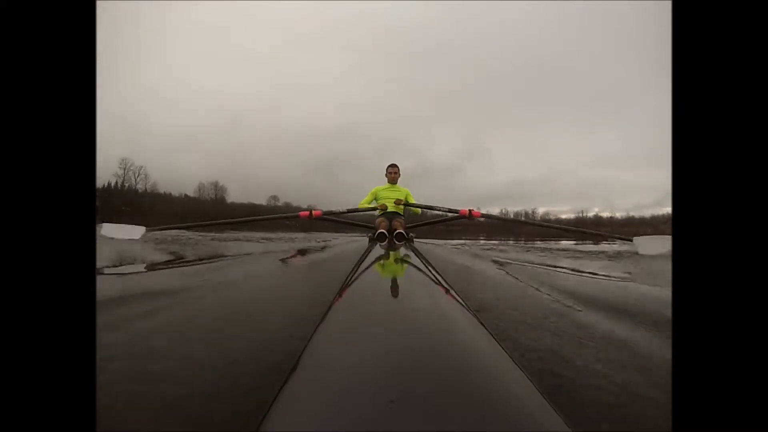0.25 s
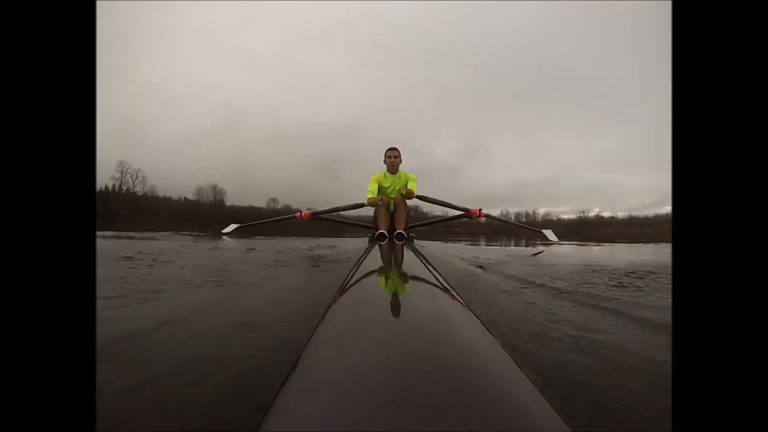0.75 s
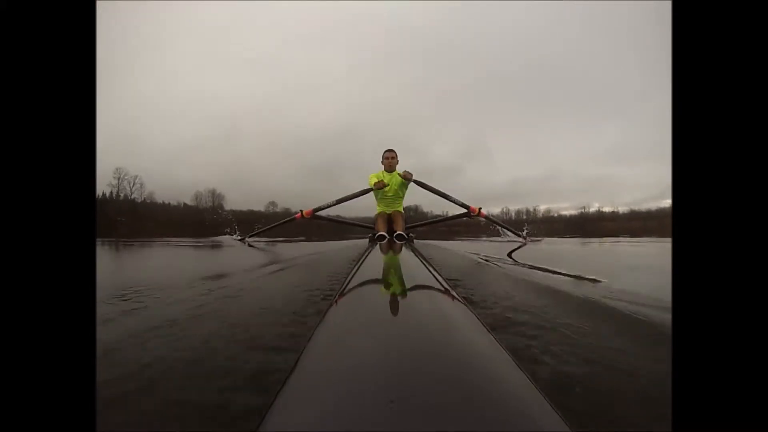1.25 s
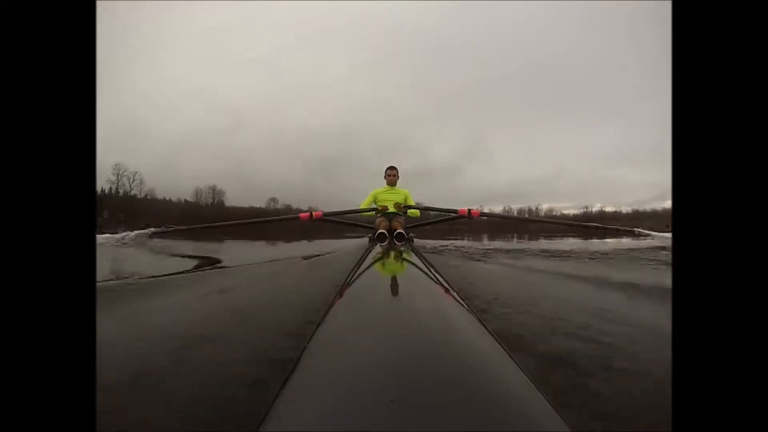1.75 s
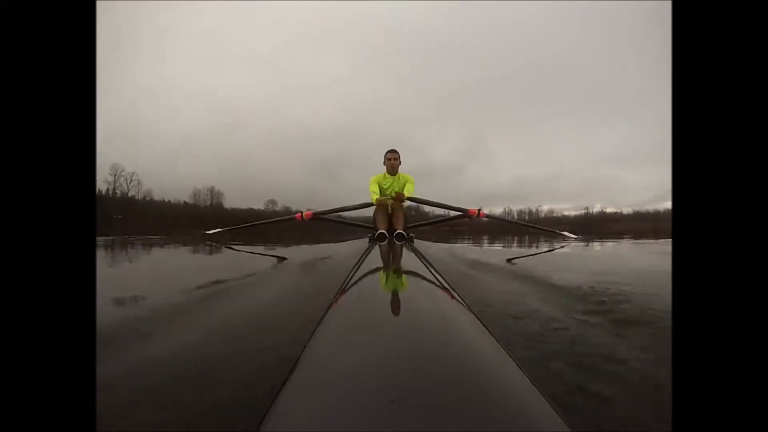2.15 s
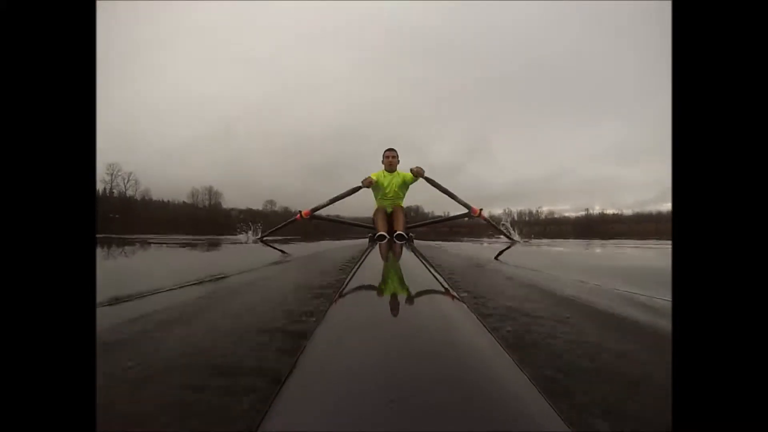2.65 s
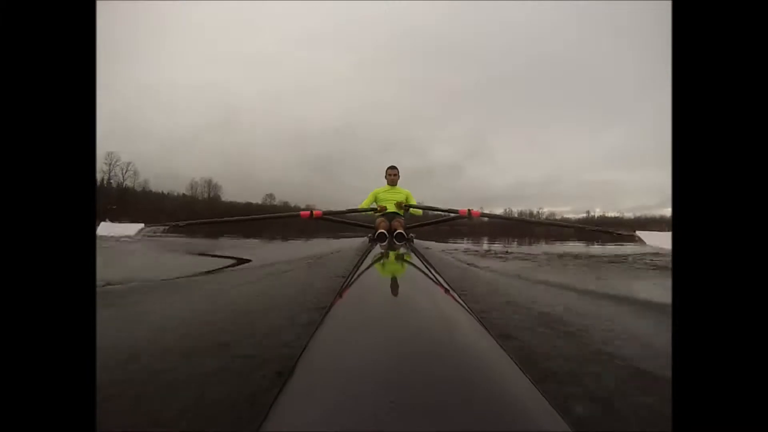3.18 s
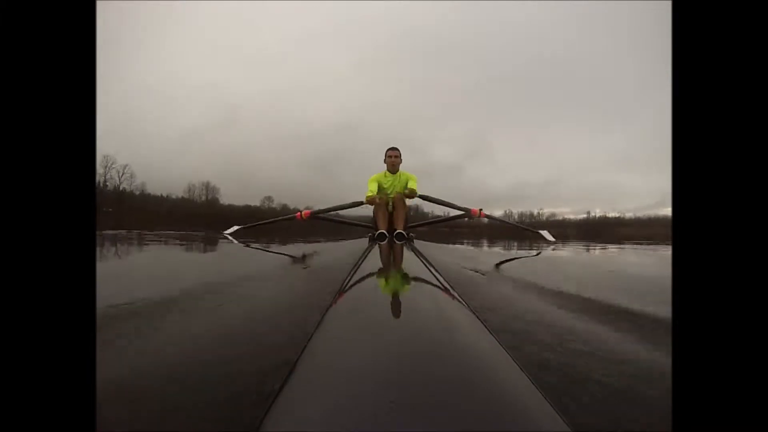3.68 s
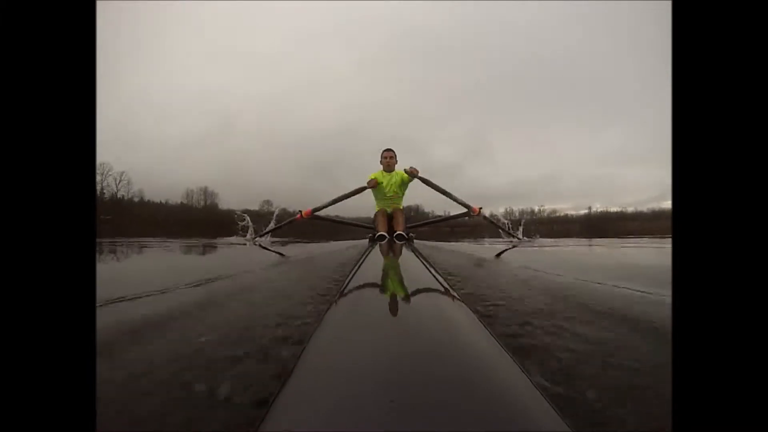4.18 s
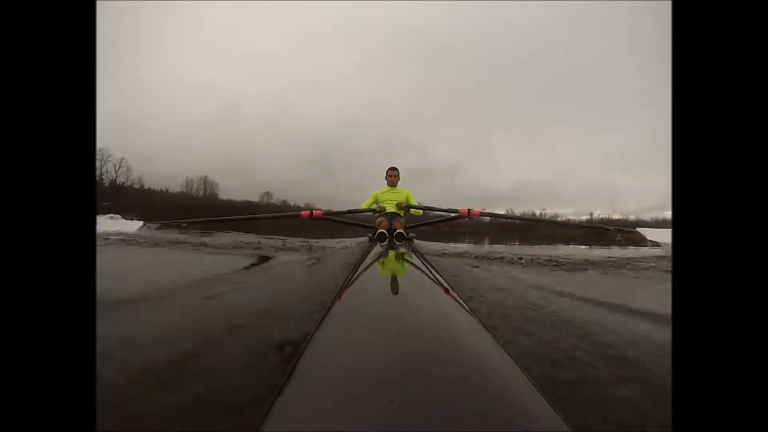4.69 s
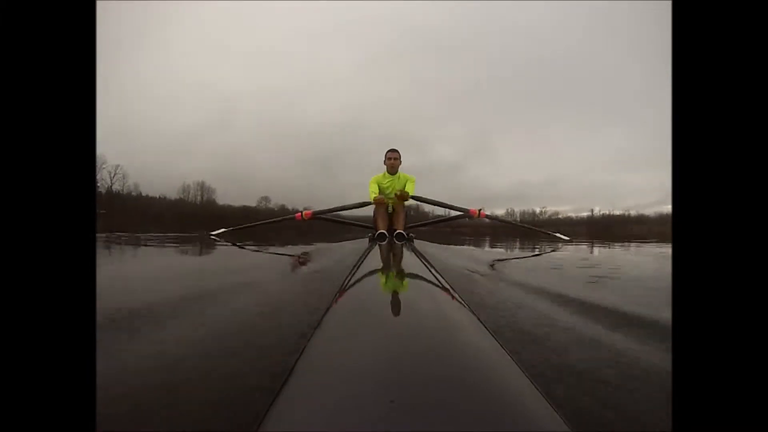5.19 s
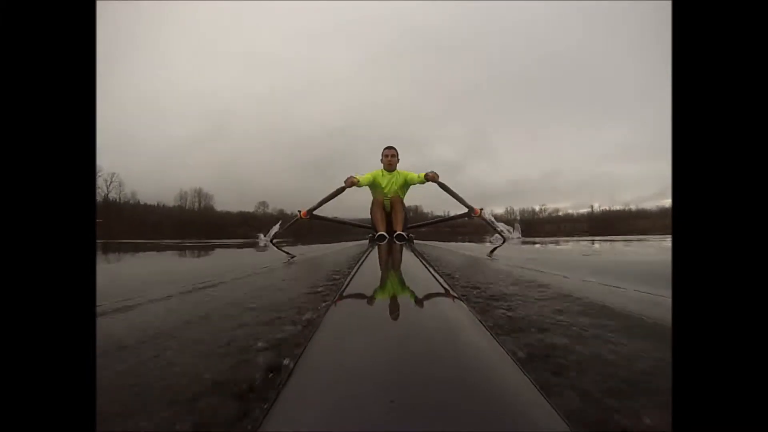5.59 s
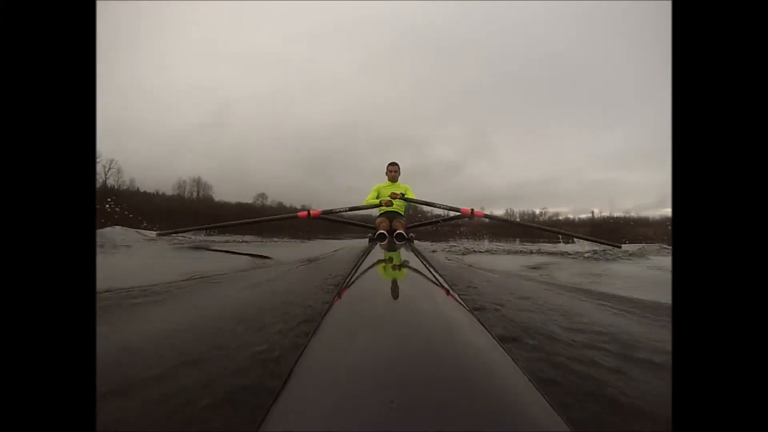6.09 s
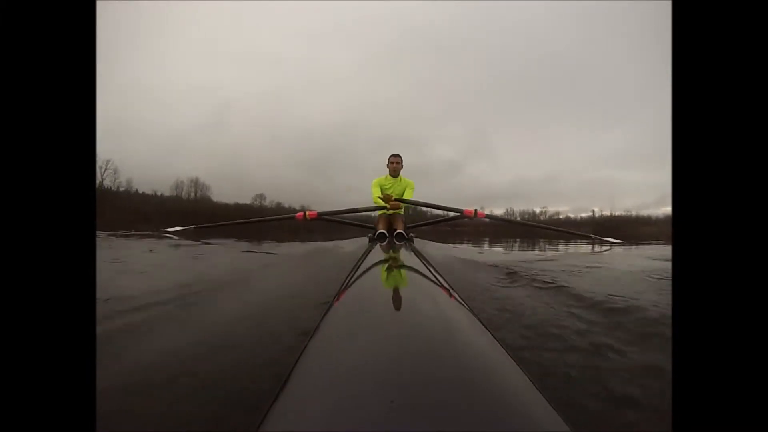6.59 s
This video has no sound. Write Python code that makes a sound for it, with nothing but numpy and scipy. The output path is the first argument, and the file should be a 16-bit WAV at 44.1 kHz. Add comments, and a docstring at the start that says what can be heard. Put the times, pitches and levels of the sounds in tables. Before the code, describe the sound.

Close, dry, outdoor sound picked up through a thin hollow hull on open water. Five strong bursts of clunking oarlocks, with scraping sleeves and tiny bright rattles, alternate with weaker double knocks. Between them come a quiet seat rumble, bubbling blades, swelling water rush and occasional drips, while the camera mount thuds and rumbles deeply underneath.

```python
"""A single scull rowed at racing pace, heard from a camera mounted on its deck as water rushes along the hull.
Five strokes pass. At each finish the oars twist and knock in their oarlocks, and the hollow hull booms.
Then the seat rolls forward; at the catch the oars knock again, the blades gurgle and the hull hums in the drive.
Knocks are decaying modes, the rest is shaped noise, grains and bubbles under swells timed to the strokes.
Throughout, the mount rumbles, hard knocks make the camera housing buzz, and drips and bubbles dot the water."""
import sys
import numpy as np
from scipy import signal
from scipy.fft import rfft, irfft, next_fast_len
from scipy.io import wavfile
from scipy.ndimage import uniform_filter1d, map_coordinates

SR = 44100
rng = np.random.default_rng(int(sys.argv[2]) if len(sys.argv) > 2 else 0)


def unload_wav(signal):
    """Save mono or channel-first audio to the path in sys.argv[1] as 16-bit WAV at rate SR, clipped to [-1, 1]."""
    wavfile.write(
        sys.argv[1],
        SR,
        np.round(np.clip(np.atleast_2d(signal).T, -1, 1) * 32767).astype(np.int16),
    )


N = 301644

# Oars knocking in their oarlocks. Each row: start in seconds, rigger level in dB, sleeve scrape level in dB,
# hull level in dB, hull pitch in Hz, hollow overtone in dB relative to the hull.
KNOCK_EVENTS = [(.303, -17.5, -18.5, -10.5, 223, -16), (0.323, -10.5, -18.5, -4.5, 217.6, -13.5),
                (.347, -36, -21.5, -4, 243, -20.5), (.402, -16.5, -18.5, -4, 255.6, -26),
                (.423, -11, -32, -0.5, 249, -17.5), (0.457, -22, -21.5, -6, 236, -35),
                (.578, -29, -35, -19.5, 218, -29), (.851, -24.5, -27, -8.5, 227, -26),
                (.925, -23, -24, -14, 236, -7), (.953, -13.5, -24, -15.5, 233, -19),
                (.986, -12.5, -32, -9.5, 222, -17), (1.08, -19, -44, -20, 238, -17),
                (1.144, -18, -22, -20, 234, -21), (1.279, -36, -47, -16.5, 250, -26),
                (1.732, -17, -18.5, -12.5, 220, -24.5), (1.737, -17.5, -27, -2, 227, -35),
                (1.765, -13, -23, -3.5, 183.5, -25), (1.776, -15, -12, -2, 262, -18.5),
                (1.803, -30, -47, 0, 224.6, -32), (1.823, -12, -21, -5, 246, -16),
                (1.847, -14, -31, 1, 229.3, -17.5), (1.89, -17, -27.5, -14.5, 211.5, -19),
                (2.41, -16.5, -20, -17.5, 241, -18), (2.434, -14, -18, -6.5, 226, -18),
                (2.486, -27, -35.5, -11, 239, -28), (2.54, -18.5, -39, -13, 243, -25),
                (2.565, -17, -33, -12, 235, -26), (2.634, -20, -24, -13.5, 230, -28),
                (3.208, -10, -16.5, -4, 194.5, -21), (3.23, -11, -22, -1.5, 235.7, -13),
                (3.267, -32, -42, -4.5, 233, -35), (3.283, -9, -44, -12, 219, -27),
                (3.309, -18, -23.5, -3.5, 252, -25), (3.911, -23.5, -34, -10, 240, -6),
                (3.925, -22, -24, -10.5, 246, -7.5), (4.058, -13, -26.5, -17, 250, -23),
                (4.094, -24, -27, -8.5, 235, -21), (4.118, -18.5, -32, -20.5, 238, -22),
                (4.686, -17.5, -31.5, -7, 204.5, -11.5), (4.705, -13.5, -27, -6, 206, -18),
                (4.728, -33, -35, -2.5, 233, -16), (4.776, -7.5, -15.5, -2, 215, -19.5),
                (4.804, -33, -32, -0.5, 223, -30), (4.839, -29, -41, -11.5, 213, -23),
                (4.901, -22, -25, -10, 220, -35), (5.471, -11, -36, -5, 249.5, -14),
                (5.487, -23, -35, -3.5, 251, -16), (5.656, -25, -32.5, -7.5, 282.3, -6.5),
                (6.242, -11.5, -22.5, -4.5, 211, -26), (6.283, -31, -35, -6, 256.6, -27.5),
                (6.327, -10.5, -22, -7.5, 232.4, -19), (6.356, -14, -21, 0, 216.6, -22),
                (6.513, -25, -31, -16, 213, -28)]
# Bright tone of the camera housing, fittings and splats. Each row: frequency in Hz, relative level in dB.
HOUSING_TONE = [(1000, -27.5), (3000, -3.5), (5000, -8.5), (6300, -3), (7700, -1.5), (8800, -8.5),
                (10200, -5), (13000, -17), (15500, -32)]
# Stray low bumps between the knocks. Each row: time in seconds, mount sway in dB, air buffeting in dB.
LOW_BUMPS = [(.8, -15.5, -25), (2.72, -13, -34), (2.951, -13, -28), (3.94, -17, -14.5), (4.18, -17, -22.5),
             (5.181, -22, -30), (5.67, -18, -22)]


def amp(db):
    """Decibels to gain."""
    return 10 ** (np.asarray(db) / 20)


def unit(x):
    """Scale to rms 1."""
    return x / np.sqrt(np.mean(x ** 2) + 1e-20)


def crest(x):
    """Scale to peak 1."""
    return x / np.max(np.abs(x))


def decay(t, t60):
    """Exponential fade that falls 60 dB in t60 seconds."""
    return amp(-60 * t / t60)


def onset(t, rise_s):
    """Soft start with time constant rise_s."""
    return 1 - np.exp(-t / rise_s)


def add(track, s, sound):
    """Mix a sound into a track at time s."""
    part = track[max(0, round(s * SR)):][:len(sound)]
    part += sound[:len(part)]


def wobble(rate):
    """A smooth random curve, rate knots a second."""
    knots = rng.standard_normal(int(N * rate / SR) + 4)
    return map_coordinates(knots, [np.arange(N) * rate / SR])


def colour(x, points):
    """Causal minimum-phase filter with the gain of the (Hz, dB) points, built by folding the cepstrum."""
    m = 2 * next_fast_len(len(x) // 2 + 4096)
    hz, db = np.transpose(points)
    f = np.fft.rfftfreq(m, 1 / SR)
    gain = amp(np.interp(np.log(f + 1), np.log(hz), db))
    cepstrum = irfft(np.log(gain))
    cepstrum[1:m // 2] *= 2
    cepstrum[m // 2 + 1:] = 0
    return irfft(rfft(x, m) * np.exp(rfft(cepstrum)))[:len(x)]


def even_out(x, count):
    """Even out the level of a noise over count samples."""
    power = np.abs(uniform_filter1d(unit(x) ** 2, size=count))
    return x / np.sqrt(power + 0.024) / np.std(x)


def grains(rate, spread_db):
    """Random impulses of uneven size, on average rate a second, rms 1."""
    hits = rng.random(N) < rate / SR
    return unit(hits * rng.standard_normal(N) * amp(spread_db * rng.standard_normal(N)))


def ring(modes, t, scatter_db, detune):
    """Decaying modes, with new strengths and slightly new pitches at each blow."""
    hz, db, t60 = np.transpose(modes)[:, :, None]
    size, shift, phase = rng.standard_normal((3, len(modes), 1))
    envelope = amp(db + scatter_db * size - 60 * t / t60)
    tone = np.sin(2 * np.pi * (hz * (1 + detune * shift) * t + phase))
    return np.sum(envelope * tone, axis=0)


def through_deck(x):
    """Sound carried by the thin carbon deck is boosted at its resonances and thinned at its nulls."""
    # Each row: centre in Hz, width in Hz, boost or cut in dB.
    deck_peaks = [(415, 27, 6), (524, 72, -4), (572, 32, 4), (774, 74, 5), (861.5, 9.7, 8),
                  (1060, 20, -4.5), (1275, 100, -6.5), (1500, 68, 2), (1860, 66, 4), (2700, 160, 2.5),
                  (3640, 330, -10.5), (3890, 190, 6), (4500, 180, -20), (5210, 200, 7)]
    m = next_fast_len(N + SR // 2)
    f = np.fft.rfftfreq(m, 1 / SR)
    response = np.ones(len(f), dtype=complex)
    for hz, width, db in deck_peaks:
        damping = 1j * f * width
        response *= 1 + (amp(db) - 1) * damping / (hz * hz - f * f + damping)
    return irfft(rfft(x, m) * response, m)[:N]


def froth(pitch_hz, spread, cycles, count):
    """A crowd of small rising bubbles of uneven pitch and size, each dying over the given cycles, rms 1."""
    t = np.arange(SR // 50) / SR
    pitch, size = rng.standard_normal((count, 2)).T[:, :, None]
    hz = np.clip(pitch_hz * np.exp(spread * pitch), 500, 12000)
    envelope = amp(3.5 * np.clip(size, -2, 2) - 60 * t * hz / cycles)
    plinks = envelope * np.sin(2 * np.pi * hz * (t + t * t))
    where = rng.integers(0, N, (count, 1)) + np.arange(len(t))
    return unit(np.bincount(where.ravel(), plinks.ravel(), N)[:N])


def swell(starts, db, attack_s, hold_s, release_s):
    """Power of a swell at each start time; attack and release each span 20 dB."""
    steps = np.arange(0, N, SR // 1000)
    t = steps / SR - np.reshape(starts, (-1, 1))
    before = np.maximum(-t, 0) / attack_s
    after = np.maximum(t - np.reshape(hold_s, (-1, 1)), 0) / release_s
    power = amp(np.reshape(db, (-1, 1)) - 20 * (before + after)) ** 2
    return np.interp(np.arange(N), steps, np.sum(power, axis=0))


def together(*powers, rest_db):
    """Level in dB of several swells over a resting level."""
    return 10 * np.log10(sum(powers) + amp(rest_db) ** 2)


def oarlocks():
    """Each contact rings the rigger, one mode added on top, and the sleeve scrapes on as it seats itself."""
    # Modes of oarlock and rigger. Each row: frequency in Hz, relative level in dB, 60 dB decay in seconds.
    rigger_modes = [(535, -6, 0.17), (679.3, -1.5, 0.12), (763, 4.5, 0.094), (866, 3.5, 0.099),
                    (905, -29.5, 0.05), (1041, -5, 0.083), (1170, -6.5, 0.15), (1250, -14, 0.06),
                    (1640, -23.5, .03), (1900, -25, 0.12), (2050, -5, 0.023)]
    # Scrape tone. Each row: frequency in Hz, relative level in dB.
    scrape_tone = [(150, -26.5), (330, 11.5), (550, -11), (850, -5), (1200, -5.5), (2000, -6),
                   (2800, -26.5), (4500, -30), (9000, -47.5), (15000, -96.5)]
    rings, scrapes, t = np.zeros(N), np.zeros(N), np.arange(SR // 6) / SR
    for s, db, scrape_db, *_ in KNOCK_EVENTS:
        hz = 790 * np.exp(0.085 * rng.standard_normal())  # the main ring shifts from blow to blow
        main = np.sin(2 * np.pi * hz * t) * decay(t, 0.02)
        others = crest(ring(rigger_modes, t, scatter_db=4.5, detune=0.015))
        metal = crest((main + 0.49 * others) * onset(t, .001))
        noise = rng.standard_normal(len(t))
        # the scrape's level jumps every 2 ms
        jumps = np.repeat(rng.standard_normal(len(t)), repeats=SR // 500)[:len(t)]
        slips = noise * amp(2.7 * jumps) * onset(t, .0015) * decay(t, 0.12)
        add(rings, s, amp(db - 4.5) * metal)
        add(scrapes, s, amp(scrape_db) * crest(colour(slips, scrape_tone)))
    return rings + through_deck(scrapes)


def hull_knocks():
    """Each blow flexes the deck for a few cycles with a hollow overtone; the hull takes up energy and rings on."""
    # The hollow hull. Each row: frequency in Hz, relative level in dB, 60 dB decay in seconds.
    hull_modes = [(160.6, -9, 0.89), (217.8, -8, 0.4), (239.2, 0.5, .3), (262.8, 0.5, 0.16),
                  (309.5, -16.5, 0.081), (416, -24.5, 0.13)]
    # Stiffer bending modes of the deck, in the same columns: Hz, dB, seconds.
    bending_modes = [(362, -3.5, 0.062), (404, 5, 0.035), (423.4, -11.5, 0.079)]
    out, t = np.zeros(N), np.arange(SR // 2) / SR
    for s, _, _, db, hz, overtone_db in KNOCK_EVENTS:
        flex = crest(np.sin(2 * np.pi * hz * t) * onset(t, 0.0028) ** 2 * decay(t, 0.069))
        hollow = crest(ring(bending_modes, t, scatter_db=3, detune=0.012) * onset(t, 0.0018))
        boom = crest(ring(hull_modes, t, scatter_db=3, detune=0.0092) * onset(t, .015))
        add(out, s, amp(db - 3) * flex + amp(db + overtone_db - 2.0) * hollow + amp(db - 11) * boom)
    return out


def feathering(finish, finish_db):
    """The sleeves rattle as the blades are pulled out, and again as they are turned flat."""
    # Rattle of the sleeves. Each row: frequency in Hz, relative level in dB.
    rattle_tone = [(250, -30), (500, 0), (850, -2.5), (1300, -3), (2000, -11), (2800, -29.5), (4500, -35.5),
                   (9000, -39.5), (15000, -77.5)]
    pull = swell(finish + 0.0023, db=finish_db - 34, attack_s=.008, hold_s=0.038, release_s=.06)
    turn = swell(finish + 0.088, db=finish_db - 39, attack_s=0.023, hold_s=0.064, release_s=.06)
    rattle = unit(through_deck(colour(grains(700, spread_db=6), rattle_tone)))
    return np.sqrt(pull + turn) * rattle


def housing(deck):
    """The camera housing ticks at each crest of the deck's swing that exceeds its slack."""
    slack = .15  # deck amplitude
    swing = np.abs(uniform_filter1d(deck, size=SR // 1000))
    crests = signal.argrelmax(swing, order=40)[0]
    taps = np.zeros(N)
    taps[crests] = np.tanh(np.maximum(swing[crests] - slack, 0) / 0.56)
    taps *= amp(5 * rng.uniform(-1, 1, N))  # uneven by up to 5 dB either way
    contact = decay(np.arange(SR // 200) / SR, .0013)
    chatter = signal.fftconvolve(taps, contact)[:N] * rng.standard_normal(N)
    return amp(-23) * colour(chatter, HOUSING_TONE)


def ticks():
    """Loose fittings give short bright ticks: noise that dies within milliseconds."""
    # Each row: start in seconds, peak level in dB.
    tick_events = [(.424, -42), (0.4609, -33.5), (1.747, -29), (1.786, -33), (1.81, -36), (1.8552, -26.5),
                   (1.989, -42), (2.6294, -37), (3.2126, -30), (4.775, -34), (4.8474, -30), (4.9486, -33),
                   (5.815, -40), (6.258, -30), (6.3603, -25.5)]
    out, t = np.zeros(N), np.arange(SR // 30) / SR
    for s, db in tick_events:
        burst = rng.standard_normal(len(t)) * decay(t, .002)
        add(out, s, amp(db) * crest(colour(burst, HOUSING_TONE)))
    return out


def grind_level(finish, catch, slide_db, drive_db):
    """The collars twist at the finish; the seat rolls up to the catch and is pushed away under load."""
    feather = swell(finish + .015, db=-38.5, attack_s=0.02, hold_s=0.11, release_s=0.14)
    slide = swell(catch - .17, db=slide_db - 43.0, attack_s=0.11, hold_s=0.079, release_s=0.18)
    entry = swell(catch + 0.024, db=-37.5, attack_s=0.065, hold_s=0.062, release_s=.15)
    push = swell(catch + 0.21, db=drive_db - 37, attack_s=0.19, hold_s=0.078, release_s=0.27)
    return together(feather, slide, entry, push, rest_db=-58)


def grinding(grind_db):
    """Seat wheels and twisting collars feed a stream of small jolts into the frame."""
    # Each row: frequency in Hz, relative level in dB.
    grind_tone = [(250, -25), (360, 2), (520, -4), (680, 1.5), (830, 4), (1000, 1), (1300, -7.5),
                  (1900, -6.5), (2600, -21.5), (4000, -53.5), (12000, -100)]
    jolts = grains(900, spread_db=-1) + 0.88 * rng.standard_normal(N)
    uneven_db = wobble(40)
    return amp(grind_db + 3.0 + uneven_db) * unit(through_deck(colour(jolts, grind_tone)))


def drone_level(finish, catch, finish_db, slide_db, drive_db):
    """The hull hums on after each finish, under the sliding seat, and through the leg drive."""
    feather = swell(finish + 0.031, db=finish_db - 23.5, attack_s=0.052, hold_s=.1, release_s=0.39)
    slide = swell(catch - .18, db=slide_db - 30.5, attack_s=0.14, hold_s=0.11, release_s=0.08)
    push = swell(catch + .04, db=drive_db - 24.5, attack_s=0.11, hold_s=.19, release_s=0.41)
    return together(feather, slide, push, rest_db=-40.5)


def drone(drone_db):
    """The hull hums under the rolling seat and the slapping water."""
    # Each row: frequency in Hz, relative level in dB.
    hum_tone = [(60, -32), (95, -1.5), (125, -10.5), (158, 1.5), (190, -2.5), (235, 1), (270, 1.5),
                (310, -11), (420, -24.5), (520, -24.5), (1000, -73.5), (4000, -145)]
    hum = even_out(colour(rng.standard_normal(N), hum_tone), count=SR // 25)
    return amp(drone_db + 1.5) * hum


def gurgle(catch):
    """The buried blades drag air under, which breaks up into low bubbles through the drive."""
    power = swell(catch + 0.024, db=-42, attack_s=0.086, hold_s=0.23, release_s=0.33)
    low_bubbles = froth(pitch_hz=904, spread=.35, cycles=19, count=500)
    return np.sqrt(power) * unit(through_deck(low_bubbles))


def rush_level(finish, catch):
    """The boat speeds up through the drive, surges again as the rower slides back, and the buried blades churn."""
    # Uneven loudness of the water rush from moment to moment, added to the stroke swells.
    # Each row: time in seconds, gain in dB.
    rush_curve = [(0, -3), (.28, -16), (.55, -9), (.9, -4), (1.9, -2.5), (2.9, -.5), (3.2, 0), (3.55, -3),
                  (4.1, 1), (4.5, -0.5), (5.0, 1.5), (5.4, 0.5), (5.8, -0.5), (6.2, 0.5), (6.84, -0.5)]
    drive = swell(finish, db=-43.5, attack_s=0.49, hold_s=0.017, release_s=0.19)
    surge_from = finish + .5
    surge = swell(surge_from, db=-43, attack_s=0.4, hold_s=catch - surge_from, release_s=0.31)
    churn = swell(catch + 0.14, db=-45.0, attack_s=0.042, hold_s=0.013, release_s=0.62)
    uneven_db = np.interp(np.arange(N) / SR, *np.transpose(rush_curve))
    return together(drive, surge, churn, rest_db=-51) + uneven_db


def water(rush_db):
    """Fizz and bubbles along the hull, stronger as the boat runs faster, over a faint steady hiss and spray."""
    # Rush along the hull. Each row: frequency in Hz, relative level in dB.
    rush_tone = [(300, -26), (850, -7.5), (1100, -1.5), (1650, -3.5), (1980, 3.5), (2500, -6.5),
                 (3200, -15.5), (4200, -20), (5200, -21), (6800, -26), (8000, -36.5), (10700, -33),
                 (13000, -44.5), (15000, -77.5)]
    # Steady hiss, in the same columns: Hz, dB.
    hiss_tone = [(2000, 6), (6000, -3), (8000, -9), (10700, -9), (12500, -14.5), (14500, -13), (15500, -22)]
    bubbles = froth(pitch_hz=2390, spread=.6, cycles=58, count=2200)
    fizz = unit(colour(rng.standard_normal(N), rush_tone))
    wash = fizz + .7 * unit(colour(bubbles, rush_tone))
    hiss = amp(-60) * unit(colour(rng.standard_normal(N), hiss_tone))
    spray = amp(-65.5) * froth(pitch_hz=4500, spread=.22, cycles=35, count=700)  # fine droplets
    flicker_db = 1.8 * wobble(25)
    return amp(rush_db + 3.5 + flicker_db) * unit(through_deck(wash)) + hiss + spray


def bubble(t, hz, t60, rise):
    """A bubble rings and rises in pitch as it nears the surface, by the fraction rise each second."""
    tone = np.sin(2 * np.pi * hz * (t + rise * t * t / 2))
    return crest(tone * decay(t, t60) * onset(t, 0.00082))


def drips():
    """Drops near the deck splat and trap a tiny bubble; larger bubbles burst beside the hull with a plink."""
    # Each row: start in seconds, level in dB, starting bubble pitch in Hz, relative splat level in dB,
    # 60 dB decay of the bubble in seconds.
    drop_events = [(0.167, -50, 2800, -20, 0.0078), (1.1962, -47.5, 2810, -24, 0.0077),
                   (2.7658, -40, 3900, -28, 0.0065), (3.8938, -41, 3350, -20, 0.0062),
                   (6.645, -37, 3800, -18, 0.0073), (6.6652, -33.5, 3230, -16, 0.007),
                   (6.682, -37.5, 3050, -18, 0.0064)]
    # Larger bubbles. Each row: start in seconds, level in dB, starting pitch in Hz.
    bubble_events = [(0.7514, -23, 1830), (2.4159, -22, 1880), (3.0959, -26, 1290), (3.9794, -19, 1760),
                     (5.453, -22, 1920), (6.7007, -20, 1945)]
    out, t = np.zeros(N), np.arange(SR // 15) / SR
    for s, db, hz, splat_db, t60 in drop_events:
        splat = crest(colour(rng.standard_normal(len(t)) * decay(t, 0.0066), HOUSING_TONE))
        plip = bubble(t, hz, t60=t60, rise=25)
        add(out, s, amp(db + 2) * (plip + amp(splat_db + 15.0) * splat))
    for s, db, hz in bubble_events:
        add(out, s, amp(db - 12) * bubble(t, hz, t60=0.082, rise=0.69))
    return out


def sway_level(finish, catch):
    """The mount is shaken hard at the finish, lightly at the catch, and by stray bumps."""
    s, db, _ = np.transpose(LOW_BUMPS)
    shake = swell(finish + 0.039, db=-15, attack_s=0.052, hold_s=.12, release_s=0.21)
    check = swell(catch + .02, db=-24, attack_s=.1, hold_s=0.11, release_s=0.26)
    stray = swell(s, db, attack_s=0.12, hold_s=0.02, release_s=0.18)
    return together(shake, check, stray, rest_db=-28.5) + 1.6 * wobble(9)


def buffet_level(finish, catch, gust_db):
    """Each change of the boat's speed stirs the air at the camera."""
    s, _, db = np.transpose(LOW_BUMPS)
    jolt = swell(finish + 0.038, db=gust_db - 18.0, attack_s=0.013, hold_s=0.03, release_s=0.18)
    glide = swell(finish + .2, db=gust_db - 22.0, attack_s=0.22, hold_s=0.093, release_s=0.46)
    push = swell(catch + 0.025, db=-20.5, attack_s=0.077, hold_s=0.24, release_s=0.44)
    stray = swell(s, db, attack_s=0.026, hold_s=0.017, release_s=.1)
    return together(jolt, glide, push, stray, rest_db=-32.5)


def rumble(sway_db, buffet_db):
    """The camera sways on its springy mount, and moving air buffets the housing."""
    # Mount sway. Each row: frequency in Hz, relative level in dB.
    sway_tone = [(12, -18.5), (24, -12), (31, -7), (37.5, 6.5), (46, -1), (58, -14.5), (100, -44),
                 (200, -81.5), (1000, -145)]
    # Air buffeting, in the same columns: Hz, dB.
    buffet_tone = [(30, -26.5), (48, 1), (58, -0.5), (70, -8), (95, -15), (130, -16), (180, -23.5),
                   (400, -74), (2500, -145)]
    sway = even_out(colour(rng.standard_normal(N), sway_tone), count=SR // 10)
    buffet = even_out(colour(rng.standard_normal(N), buffet_tone), count=SR // 12)
    return amp(sway_db + 1.0) * sway + amp(buffet_db) * buffet


def scene():
    """Knocks and grinding travel through the deck to the camera; water and air surround it."""
    # One row per stroke; the blades leave the water at the finish and enter it again at the catch.
    # Each row: finish in seconds, catch in seconds, then relative levels in dB of the finish,
    # of the seat's slide, of the leg drive and of the gusts.
    stroke_rows = [(0.3, 0.893, 2, -1.5, 0.5, 1.5), (1.737, 2.39, 1, -1, 1, 1),
                   (3.196, 3.893, -1.5, -3, -0.5, 1.5), (4.691, 5.446, -1, 3, 1, 2.5),
                   (6.231, 6.94, 2.5, -4.5, -3, -2)]
    finish, catch, finish_db, slide_db, drive_db, gust_db = np.transpose(stroke_rows)
    hum = drone(drone_level(finish, catch, finish_db, slide_db, drive_db))
    seat = grinding(grind_level(finish, catch, slide_db, drive_db))
    deck = hull_knocks() + oarlocks() + feathering(finish, finish_db) + hum + seat
    fittings = housing(deck) + ticks()
    wet = drips() + gurgle(catch) + water(rush_level(finish, catch))
    air = rumble(sway_level(finish, catch), buffet_level(finish, catch, gust_db))
    return (deck + fittings + wet + air)[None]


def record(dry):
    """The camera rounds off the highest peaks and keeps nothing above its band limit."""
    top_hz = 15500
    held = dry / (1 + np.abs(dry / .95) ** 8) ** (1 / 8)
    m = next_fast_len(N + SR // 2)
    passed = np.fft.rfftfreq(m, 1 / SR) < top_hz
    return irfft(rfft(held, m) * passed, m)[..., :N]


dry = scene()
out = record(dry)
unload_wav(out)
```